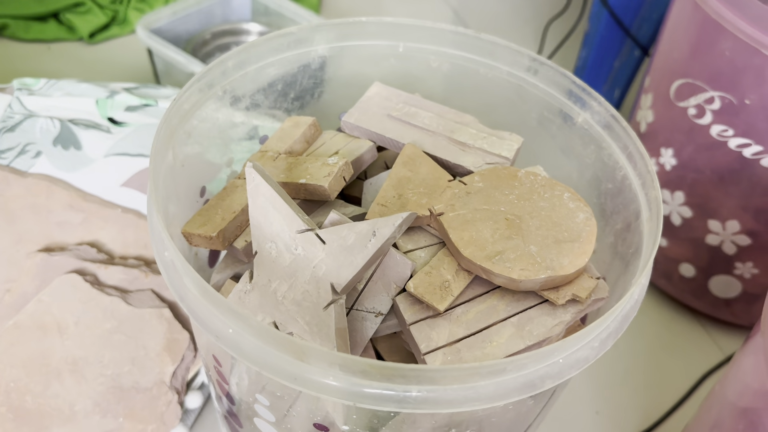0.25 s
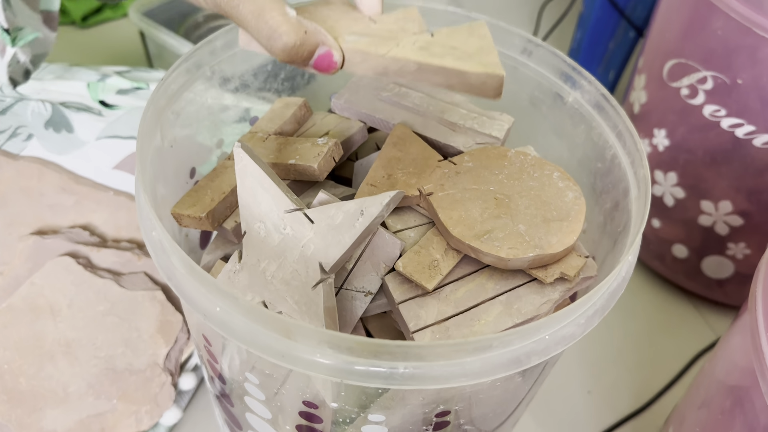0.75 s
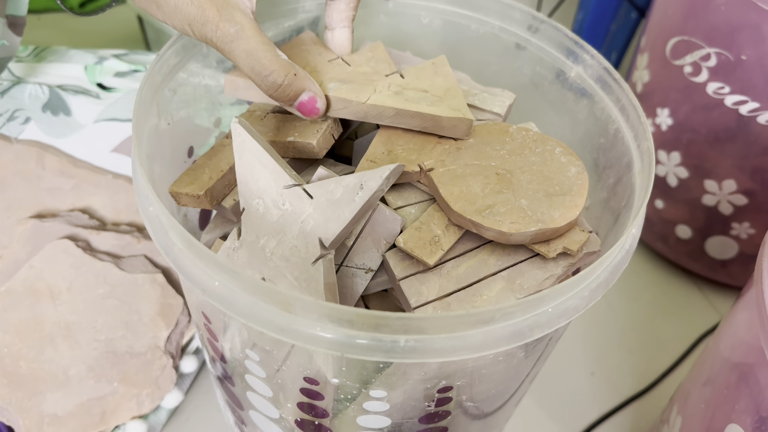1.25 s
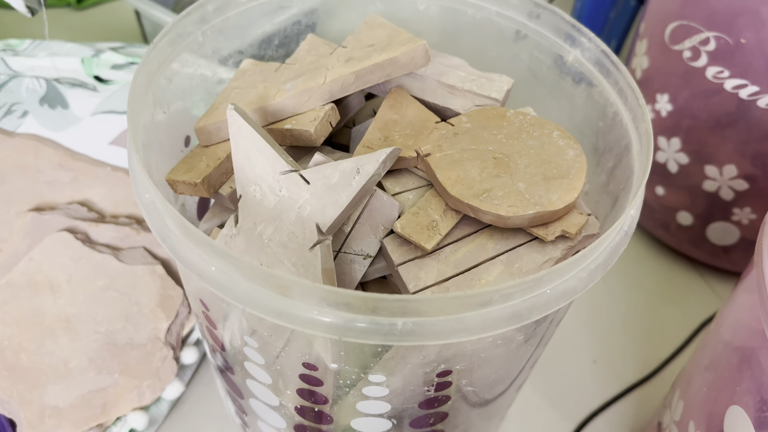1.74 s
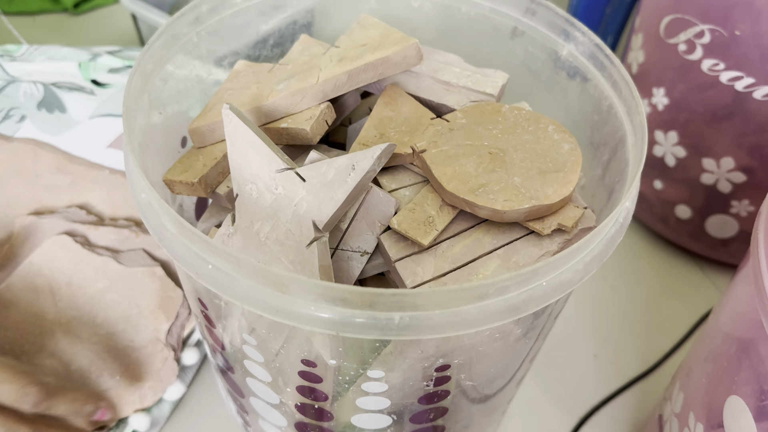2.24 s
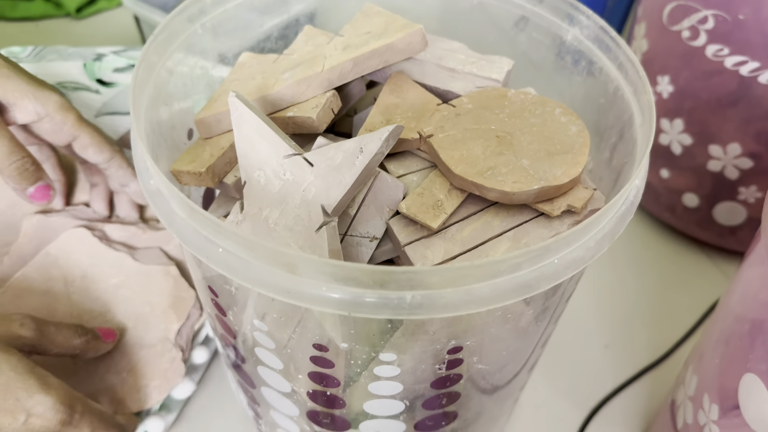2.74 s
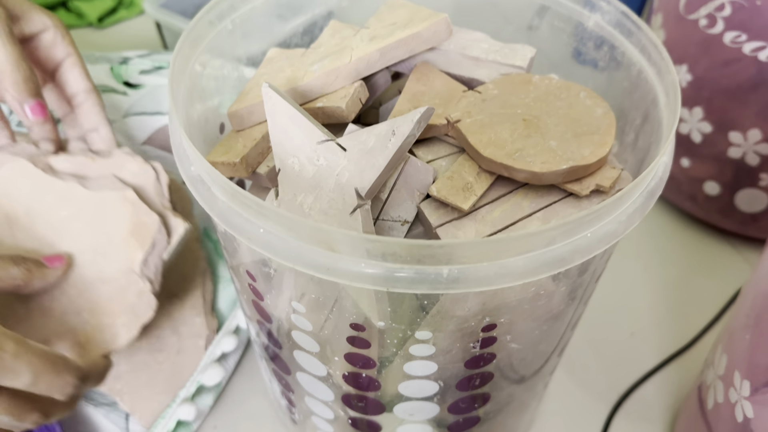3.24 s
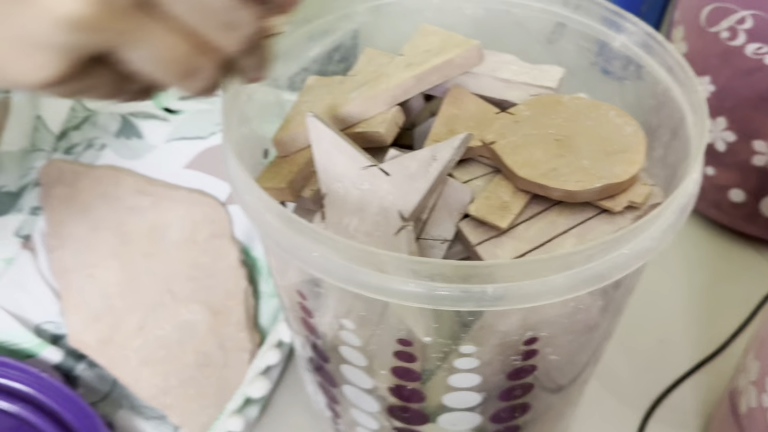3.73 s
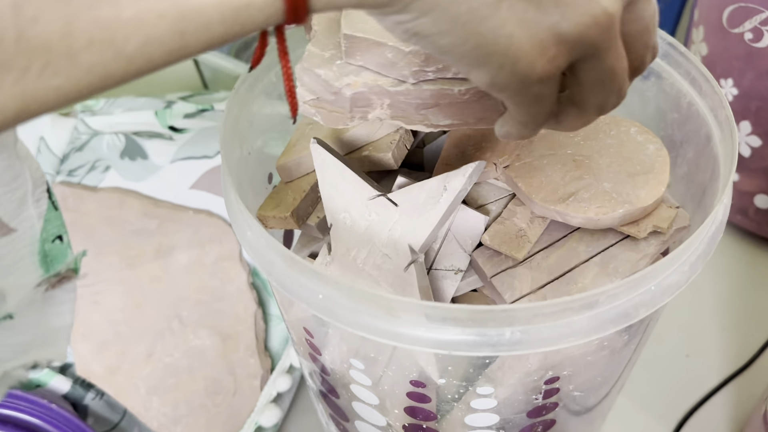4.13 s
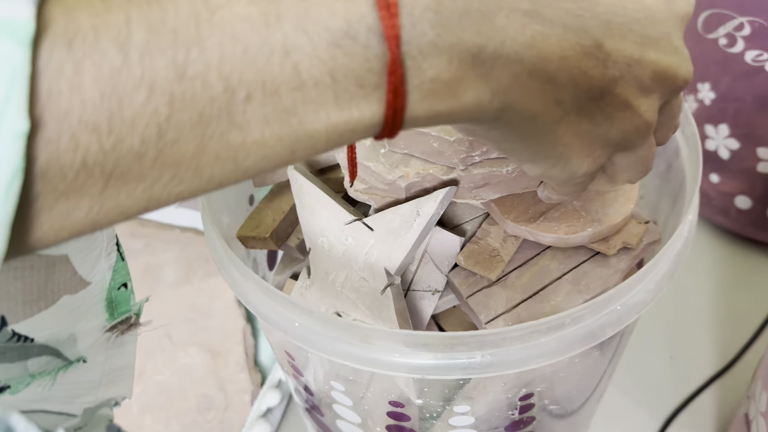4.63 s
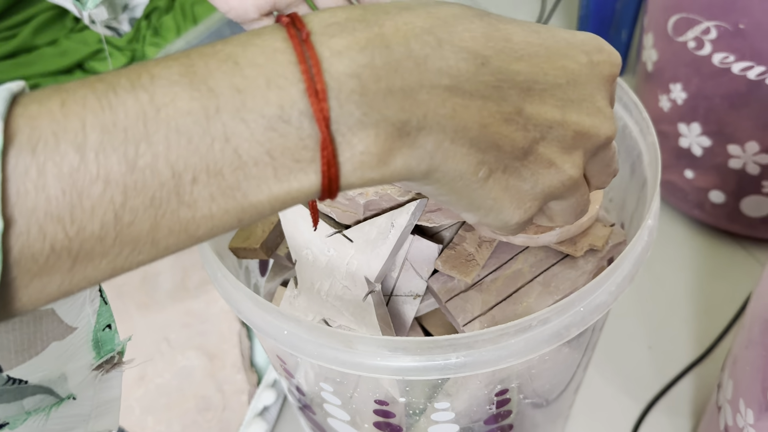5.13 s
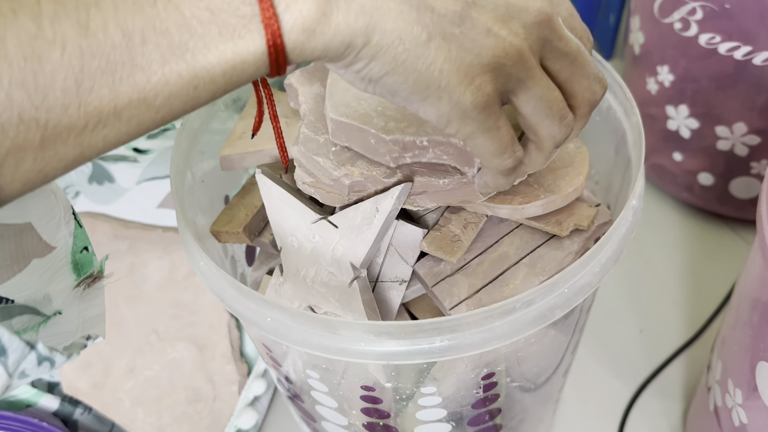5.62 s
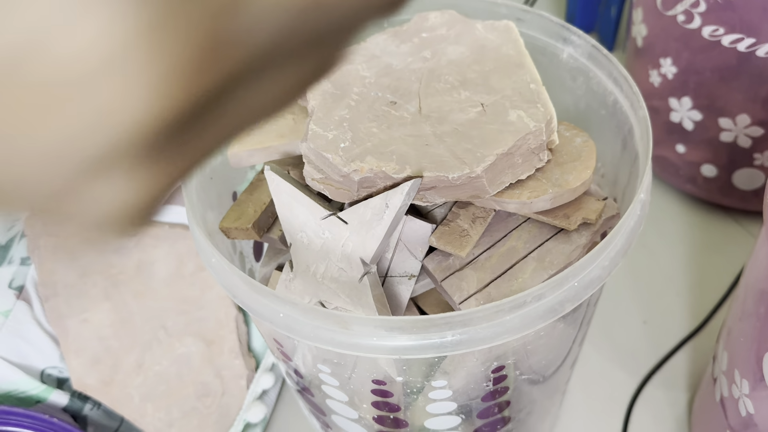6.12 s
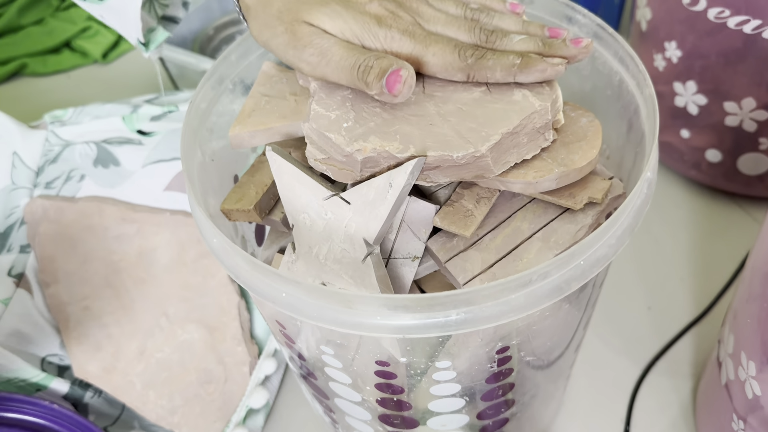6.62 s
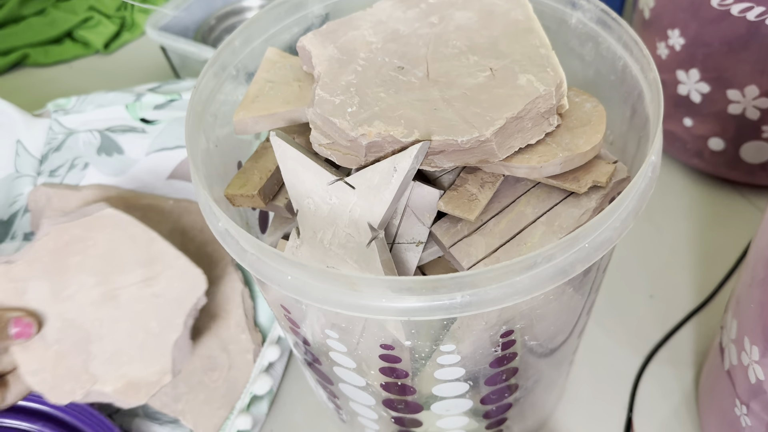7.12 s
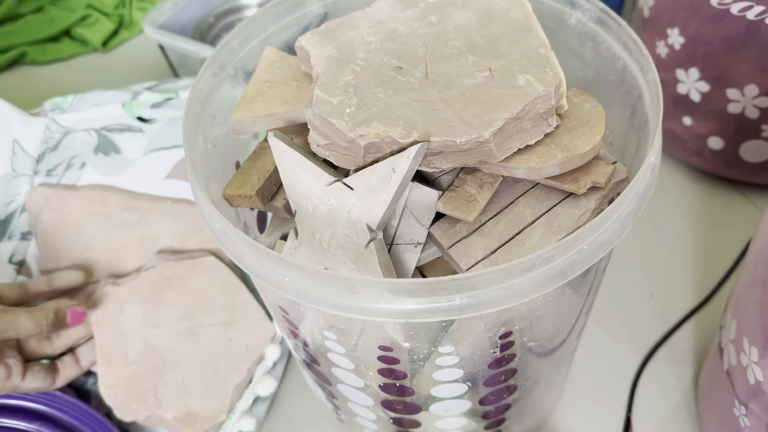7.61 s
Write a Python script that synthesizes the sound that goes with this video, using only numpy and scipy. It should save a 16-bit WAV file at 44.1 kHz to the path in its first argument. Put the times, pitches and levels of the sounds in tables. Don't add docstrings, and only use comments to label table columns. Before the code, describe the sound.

Dry, brittle clay pieces clack, tick and scrape as hands stack them in a plastic tub indoors, over a low distant street rumble.

```python
import sys
import numpy as np
from scipy import signal
from scipy.fft import rfft, irfft
from scipy.io import wavfile
from scipy.ndimage import uniform_filter1d

SR = 44100
rng = np.random.default_rng(int(sys.argv[2]) if len(sys.argv) > 2 else 0)


def voltage_ratio(decibels):
    exponent = np.asarray(decibels, float) / 20
    return 10 ** exponent


def store_pcm(level_fs):
    pcm = np.round(np.clip(level_fs, -1, 1) * 32767).astype(np.int16)
    wavfile.write(sys.argv[1], SR, np.atleast_2d(pcm).T)


N = 346626


def knocks(events, modes, crack_db, crush_s, size, own_share=1):
    lag_s_per_db = 0.00003
    room_hears_ring, room_hears_clack = 0.5, 0.64
    out = np.zeros((3, N + size))
    t = np.arange(size) / SR
    hz, level_db, t60_s = np.transpose(modes)[:, :, None]
    bins_hz = np.arange(size // 2 + 1) * SR / size + 1
    low_cut = 1 / (1 + (0.7 * hz.min() / bins_hz) ** 4)
    high_cut = 1 / (1 + (bins_hz / hz.max() / 1.4) ** 4)
    luck = rng.standard_normal((len(events), 4, len(modes), 1))
    noises = rng.standard_normal((len(events), size))
    swell = 1 - np.exp(-t * hz / 0.71)
    decay = voltage_ratio(-60 * t / t60_s)
    for row, (uneven, detune, facing, phase), noise in zip(events, luck, noises):
        start_s, peak_db, pan_db, treble_db, room_db = row
        pan_db = np.clip(pan_db, -9, 9)
        hardness_db = (treble_db + 12) / 3

        struck = voltage_ratio(level_db + hardness_db * np.log2(hz / 1000) + 1.5 * uneven)
        cycles = hz * (1 + 0.0089 * detune) * t + phase
        rings = struck * swell * np.sin(2 * np.pi * cycles) * decay
        scale = voltage_ratio(peak_db) / np.abs(rings.sum(axis=0)).max()
        ring = scale * rings.sum(axis=0)

        tilt_db = hardness_db * np.log2(np.maximum(bins_hz, hz.min()) / 1000)
        colour = voltage_ratio(at_hz(modes, bins_hz) + tilt_db) * low_cut * high_cut
        crush = irfft(rfft(noise) * colour) * t / (t + 0.18 * crush_s) * np.exp(-t / crush_s)
        crush = crush * voltage_ratio(peak_db + crack_db) / np.abs(crush).max()
        clack = np.roll(irfft(colour), 128) * (t < t[-1] / 2)
        clack = rms_one(clack) * np.sqrt(np.mean(ring ** 2))

        for ear, side in enumerate([1, -1]):
            at = round((start_s - side * pan_db * lag_s_per_db / 2) * SR)
            heard = scale * (rings * voltage_ratio(side * 2 * facing)).sum(axis=0) + crush
            out[ear, at:at + size] += voltage_ratio(side * pan_db / 2) * heard
        at = round(start_s * SR)
        feed = own_share * (room_hears_ring * ring + crush) + room_hears_clack * clack
        out[2, at:at + size] += voltage_ratio(room_db) * feed
    return out[:, :N]


def bars():
    # start_s, peak_db, pan_db, treble_db, room_db
    bar_knocks = [
        (0.065, -20.5, 7, 2, 3.5),
        (0.072, -32.5, 22, -26.5, -11),
        (0.164, -12.5, 6.5, -12.5, 1.5),
        (0.167, -14.5, 9, -8.5, -8.5),
        (0.18, -23, 6, -21, -0.5),
    ]
    # mode_hz, level_db, t60_s
    bar_modes = [(490, -4, 0.03), (657, -14, 0.0073), (800, -3.5, 0.015), (956, 1.5, 0.013),
                 (1352, 2, 0.016), (1730, -2, 0.004), (2180, -3, 0.022), (2590, -7, 0.011),
                 (3095, -7, 0.012), (3320, -11, 0.003), (4390, -16.5, 0.014), (4900, -20.5, 0.014),
                 (6480, -16.5, 0.0074), (8600, -31.5, 0.019)]
    return knocks(bar_knocks, bar_modes, crack_db=-4.5, crush_s=0.0038, size=2048, own_share=0.3)


def slabs():
    # start_s, peak_db, pan_db, treble_db, room_db
    laid_knocks = [
        (7.3272, -31, 8, -15, -9),
        (7.3305, -26, 1.5, -27.5, 0.5),
        (7.343, -29, 3.5, -34.5, 1.5),
        (7.354, -33, 0, -38, 3.5),
    ]
    # mode_hz, level_db, t60_s
    held_modes = [(198, -2.5, 0.17), (270, -14, .03), (362.4, 0.5, 0.084), (457, 3, 0.036),
                  (555, 10.5, 0.033), (785, 11.5, 0.036), (940, -1, 0.046), (1340, 7, 0.084),
                  (1700, 5, 0.042), (1980, -1, 0.034), (2350, -13.5, .01), (3100, -3, 0.037),
                  (4200, -21, .01), (6190, -11, .025)]
    # start_s, peak_db, pan_db, treble_db, room_db
    drop_knocks = [
        (7.7415, -18.5, 2.1, 0, -13),
        (7.7465, -20, 2.9, -22, 0.5),
        (7.771, -23.5, 0.58, -33, 3.5),
        (7.777, -23, 1, -30, -9),
        (7.797, -33, 1, -24.5, -8.5),
        (7.811, -30.5, 1.3, -25, -19),
        (7.838, -36, 1.5, -35, -4),
    ]
    # mode_hz, level_db, t60_s
    slab_modes = [(195.4, -4, 0.1), (276, -12, 0.026), (357.7, 1, 0.085), (392, 1, 0.051), (590, 6, 0.052),
                  (787, 12.5, 0.073), (1060, -6.5, 0.027), (1330, 5, 0.11), (1790, 0, 0.03),
                  (2225, 5, 0.034), (2750, -7, 0.014), (3240, -3.5, 0.022), (5100, -14, 0.01),
                  (6800, -16.5, 0.011)]
    laid = knocks(laid_knocks, held_modes, crack_db=-3.0, crush_s=0.0044, size=4096)
    return laid + knocks(drop_knocks, slab_modes, crack_db=-3.5, crush_s=0.0026, size=4096)


def disc():
    # start_s, peak_db, pan_db, treble_db, room_db
    disc_knocks = [
        (5.364, -29.5, 0, -27, 0.5),
        (5.936, -55, 0.00098, -20, 2),
    ]
    # start_s, peak_db, pan_db, treble_db, room_db
    disc_rocks = [
        (5.3665, -28, -1.5, -10, -21),
    ]
    # mode_hz, level_db, t60_s
    disc_modes = [(265, -1.5, 0.031), (478, -9.5, 0.06), (800, 6.5, 0.027), (1137, -2.5, 0.032),
                  (1986, 6, 0.021), (2420, -6.5, 0.053), (2550, -1, 0.024), (3160, 9.5, 0.0081),
                  (3840, -4, 0.02), (4280, -1, 0.024), (4420, -2.5, 0.03), (6200, -6, 0.004),
                  (8370, -0.5, 0.01)]
    set_down = knocks(disc_knocks, disc_modes, crack_db=-10.0, crush_s=0.002, size=2048)
    return set_down + knocks(disc_rocks, disc_modes, crack_db=-9.0, crush_s=0.0023, size=2048)


def toothed_piece():
    # start_s, peak_db, pan_db, treble_db, room_db
    touch_knocks = [
        (1.129, -37, 1, -24, 0.5),
    ]
    # mode_hz, level_db, t60_s
    touch_modes = [(372, 2, 0.0051), (720, -4, 0.02), (1430, -2, 0.025), (1910, 7, 0.021),
                   (2310, -1.5, 0.017), (2790, 1, 0.013), (3230, 0.5, 0.046), (3970, -9, 0.017),
                   (4640, -6, 0.023), (5660, -16, .01), (8160, -10, 0.0098)]
    # start_s, peak_db, pan_db, treble_db, room_db
    tooth_knocks = [(1.249, -58, 4.5, -12, -13), (1.356, -49.5, 3, -1, -8), (1.398, -52, 2, -4, -12),
                    (1.414, -48, 8, -21, 2), (1.424, -46.5, 1.5, -8, -5), (1.452, -48.5, 5, -23, 11),
                    (1.462, -56, 1, -22.5, 5), (1.488, -50, 2, -14, -12), (1.634, -58, 0.5, 6, -16)]
    # mode_hz, level_db, t60_s
    tooth_modes = [(690, 4, 0.012), (1150, 1, 0.016), (1590, -1, 0.016), (2230, 0.5, 0.03),
                   (3000, -22, .01), (3840, -9.5, .018), (4130, -13, 0.026), (5300, -12, 0.01)]
    # start_s, peak_db, pan_db, treble_db, room_db
    landing_knocks = [
        (1.5827, -32.5, 5, -8.5, -3),
        (1.599, -45, 1, -9, -3),
        (1.612, -43.5, -6, -29, 0),
        (1.640, -45, 4, -26, 2),
    ]
    # mode_hz, level_db, t60_s
    landing_modes = [(310, -6.5, 0.036), (510, -4, 0.016), (810, 0, 0.02), (1370, -5, 0.012),
                     (2080, -17, 0.031), (2560, -11, 0.016), (3520, -17.5, .012), (4600, -32.5, .012),
                     (7500, -33.5, .005)]
    touch = knocks(touch_knocks, touch_modes, crack_db=-2.5, crush_s=0.0048, size=2048)
    teeth = knocks(tooth_knocks, tooth_modes, crack_db=-2.5, crush_s=0.0045, size=2048)
    return touch + teeth + knocks(landing_knocks, landing_modes, crack_db=-1.5, crush_s=0.004, size=2048)


def pile():
    # start_s, peak_db, pan_db, treble_db, room_db
    pile_knocks = [(1.317, -51.5, 0, -43, 4), (2.512, -54.5, 5, -10, 0), (2.53, -48, 9, -36, 3.5),
                   (2.598, -54, 6, -16.5, -7), (2.869, -57.5, 8, 7, -11), (3.459, -46, 5.5, -25.5, -18),
                   (4.355, -49, 1.5, -24.5, 2), (4.437, -53.5, -7, -19, -11), (4.477, -59.5, -0.5, -9, -11),
                   (5.599, -52, 3, -41, 0), (5.618, -55, -7, -42, 3)]
    # mode_hz, level_db, t60_s
    pile_modes = [(294, -5.5, 0.014), (504, -12, 0.0019), (650, -7, 0.036), (910, -9, 0.02),
                  (1400, -12, 0.048), (1850, -14.5, 0.026), (2350, -7.5, 0.038), (3080, -16.5, 0.036),
                  (4650, -23, 0.01), (7460, -31, 0.005)]
    # start_s, peak_db, pan_db, treble_db, room_db
    stack_knocks = [(4.458, -51, 2, -17, 3), (4.483, -50.5, 5, -23, -3), (4.517, -48.5, -5, -9, -12),
                    (4.557, -36, -5, -26.5, -4), (4.721, -47.5, 3, -17, 7.5), (4.734, -56, 2, -31, -6),
                    (4.773, -44.5, 3.5, 5.5, -3.5), (4.782, -40.5, -2, -50, 2.5), (4.808, -54, 3, -31, 2),
                    (4.836, -48.5, 0, -54, -24), (6.505, -41, -3.5, -2, 2), (6.523, -41, -1.5, -9, -5),
                    (6.539, -44, -3, -43, 2.5), (6.639, -51, -4, -15, -3), (6.787, -44.5, -2, 8, -5.5),
                    (6.799, -41.5, 3, -55, -18), (6.85, -51.5, -4, -21, 4.5)]
    # mode_hz, level_db, t60_s
    stack_modes = [(300, -2.5, 0.0068), (527, -6.5, 0.027), (742, -1.5, 0.04), (871, -2.5, 0.04),
                   (1188, -8.5, 0.029), (1740, -11, 0.049), (2255, -16, 0.022), (3270, -24.5, 0.019)]
    nudged = knocks(pile_knocks, pile_modes, crack_db=1.0, crush_s=0.0054, size=2048)
    return nudged + knocks(stack_knocks, stack_modes, crack_db=-9.5, crush_s=0.026, size=4096)


def tub():
    # start_s, peak_db, pan_db, treble_db, room_db
    wall_thumps = [
        (3.7005, -25.5, -4.5, -12, -26),
        (3.713, -31.5, -9, -5, -27),
    ]
    # mode_hz, level_db, t60_s
    wall_modes = [(140, -2, 0.032), (320, -1, 0.015), (470, 0.5, 0.013), (928, -12, 0.0081),
                  (1540, -14, 0.013)]
    # start_s, peak_db, pan_db, treble_db, room_db
    air_booms = [
        (1.599, -50.5, -4, -18, -20),
        (2.534, -45, 1, -2, -33),
        (2.598, -47, 1, -1, -19),
        (5.374, -57, -1, -10, -20),
    ]
    # mode_hz, level_db, t60_s
    air_modes = [(174, -31, .3), (189.2, 0, 0.41), (199.7, -2.5, 0.3)]
    thumps = knocks(wall_thumps, wall_modes, crack_db=-6.0, crush_s=0.0057, size=2048)
    return thumps + knocks(air_booms, air_modes, crack_db=-12.0, crush_s=0.0069, size=16384)


def chips():
    # start_s, peak_db, pan_db, treble_db, room_db
    chip_ticks = [(1.129, -50, -10.5, -23, -30), (1.397, -52, 4.5, -23, -20),
                  (1.634, -54.5, -3.5, -23, -23), (2.513, -53.5, 10.5, -60, -29), (3.591, -53, 3, -30, -24),
                  (3.6985, -35, 2, -31, -20), (3.716, -35.5, 1.5, -14, -28), (4.436, -60, 4.5, -15, -20),
                  (5.366, -62.5, 7, -32, -35), (5.934, -43, 2, 21, -10), (6.14, -41, 3.5, -35, -6),
                  (6.502, -65, 14.5, -18, -10), (6.512, -61, 2, -27, -17), (6.522, -54, 5, -34, -24),
                  (6.53, -57, 3, -6, -15), (6.788, -50, 7, -6, -25), (6.797, -59, -2, -7, -17),
                  (6.805, -60, -1, -4, -15)]
    # start_s, peak_db, pan_db, treble_db, room_db
    wall_scuffs = [
        (3.688, -71, 0, -41, -34),
        (3.708, -69, 3.5, -54, -16),
    ]
    # mode_hz, level_db, t60_s
    chip_modes = [(3570, -0.5, 0.0016), (6120, 6.5, 0.0033), (8160, 6.5, 0.0044), (11800, 5, 0.004),
                  (14800, 1.5, 0.005)]
    ticks = knocks(chip_ticks, chip_modes, crack_db=0.5, crush_s=0.0023, size=1024)
    return ticks + knocks(wall_scuffs, chip_modes, crack_db=21.0, crush_s=0.0064, size=2048)


def crumbs():
    # start_s, peak_db, pan_db, pitch_hz
    crumb_hits = [(1.137, -48, -6, 373), (1.268, -61, 12, 528), (1.298, -60, -4, 470), (1.513, -48, 1, 350),
                  (1.529, -50, 8, 301), (1.544, -46, 4, 396), (1.681, -47, 5, 310), (1.74, -63, 2, 388),
                  (2.79, -58, 6, 382), (2.869, -56.5, 1, 566), (2.913, -56, 11, 360), (3.261, -64, -1, 300),
                  (3.428, -63.5, 7, 310), (3.551, -59, -1, 304), (3.578, -56, 2, 369),
                  (3.662, -50, 0.5, 475), (7.298, -65, 0, 480), (7.454, -53, 0, 568), (7.534, -54, 4, 630),
                  (7.577, -53, 1.0, 404), (7.634, -52, 2, 410), (7.682, -67, -3, 420), (7.713, -64, 6, 366)]
    # start_s, peak_db, pan_db, pitch_hz
    more_crumb_hits = [(1.315, -55, 5, 890), (1.46, -56, 2, 1040), (1.478, -59, 5, 1500),
                       (2.531, -51.5, 11, 685), (3.041, -56, 7, 626), (3.056, -55.5, 9, 620),
                       (3.431, -54, -5, 1400), (3.687, -46, -1, 800), (5.62, -62.5, 0, 1700)]
    # start_s, peak_db, pan_db, pitch_hz
    nail_ticks = [
        (2.513, -53, 2, 2460),
        (2.533, -60, 4, 2560),
        (2.549, -59, 5, 2520),
        (2.591, -57, 6, 2490),
        (3.459, -51, -6, 710),
    ]
    ring_cycles, room_db = 11.8, -0.5
    total = np.zeros((3, N))
    for start_s, peak_db, pan_db, pitch_hz in [*crumb_hits, *more_crumb_hits, *nail_ticks]:
        t60_s = ring_cycles / pitch_hz
        modes = [(pitch_hz, 0, t60_s), (2.4 * pitch_hz, -11, t60_s / 2)]
        event = (start_s, peak_db, pan_db, -12, room_db)
        total += knocks([event], modes, crack_db=-4.0, crush_s=0.0052, size=2048)
    return total


def rubbing():
    # hz, density_db
    body_spectrum = [(120, 6), (250, -1), (500, -4), (800, -10), (1400, -10.5), (2500, -19.5), (3500, -40)]
    # hz, density_db
    dust_spectrum = [(1500, -16), (2500, -0.5), (3200, 1), (4500, -4.5), (5500, -5), (6900, -1.5),
                     (8500, -6.5), (10000, -17.5)]
    # hz, density_db
    fine_spectrum = [(10500, -2.5), (12200, -2), (14300, 3.5), (15600, 4.5), (16200, -32.5)]
    still_db = [[-64.5], [-82], [-99]]
    body, dust, fine = strokes() + voltage_ratio(still_db)
    rub = body * grit(body_spectrum, grain_db=4.0)
    rub = rub + dust * grit(dust_spectrum, grain_db=2.5)
    return rub + fine * grit(fine_spectrum, grain_db=2.5)


def strokes():
    # middle_s, half_length_s, body_db, dust_db, fingertip_hiss_db
    hand_strokes = [(0.25, 0.85, -72.5, -79, -105), (1.3, 0.1, -79, -86.5, -75),
                    (1.434, 0.12, -61, -70, -85), (1.505, 0.12, -66, -70, -58.5),
                    (2.036, 0.093, -70, -88, -73), (2.402, 0.41, -73, -75, -105),
                    (2.914, 0.35, -67, -69.5, -83.5), (3.383, 0.27, -71, -77.5, -105),
                    (3.702, 0.32, -61.5, -78.5, -84.5), (4.522, 0.11, -77, -66, -88),
                    (4.89, 0.28, -99, -75.5, -105), (5.348, 0.034, -80.5, -80.5, -65),
                    (5.63, 0.055, -76, -75, -105), (5.844, 0.14, -108, -91, -66.5),
                    (6.52, 0.041, -77.5, -71, -69), (6.346, 0.44, -71, -78.5, -98),
                    (6.814, 0.065, -55.5, -99, -97), (7.026, 0.82, -84, -81.5, -84),
                    (7.652, 0.47, -68, -71, -83.5), (7.86, 0.28, -50, -72, -102)]
    fade_db, point = 31.5, 1.6
    middle_s, half_s, *levels_db = np.transpose(hand_strokes)
    t = np.arange(0, N + 64, 64) / SR
    distance = np.abs(t - middle_s[:, None]) / half_s[:, None]
    gains = voltage_ratio(np.array(levels_db)) @ voltage_ratio(-fade_db * distance ** point)
    return np.array([np.interp(np.arange(N) / SR, t, gain) for gain in gains])


def grit(spectrum, grain_db):
    grain_size = np.minimum(rng.exponential(1, N), 5)
    grains = rng.standard_normal((2, N)) * voltage_ratio(grain_db * grain_size)
    return diffuse(grains, spectrum) * voltage_ratio(1.5 * drift(30))


def rasps():
    # start_s, end_s, resonance_hz, width_hz, level_db
    slide_rasps = [(1.375, 1.565, 2290, 220, -72), (1.495, 1.581, 7510, 310, -64.5),
                   (2.301, 2.501, 6010, 260, -78), (2.41, 2.79, 3170, 210, -86),
                   (2.99, 3.17, 3140, 240, -84), (3.045, 3.19, 1360, 130, -76),
                   (3.21, 3.55, 1410, 210, -78), (3.26, 3.41, 3090, 210, -85), (4.09, 4.31, 910, 160, -78),
                   (4.21, 4.34, 1510, 310, -81), (4.47, 4.54, 6310, 400, -69),
                   (5.78, 5.917, 6970, 500, -72), (5.785, 5.925, 4710, 290, -79),
                   (7.41, 7.79, 1890, 160, -73), (7.46, 7.79, 4740, 260, -76), (7.49, 7.78, 6010, 210, -74),
                   (7.61, 7.76, 3160, 160, -76)]
    # start_s, end_s, resonance_hz, width_hz, level_db
    blow_chatters = [(1.132, 1.28, 1920, 110, -66), (1.133, 1.24, 4680, 160, -76),
                     (1.134, 1.24, 3320, 150, -75), (5.372, 5.56, 4410, 120, -69),
                     (5.372, 5.5, 2003, 120, -67), (7.335, 7.48, 3200, 200, -69),
                     (7.752, 7.9, 1357, 80, -58), (7.752, 7.9, 2230, 110, -59),
                     (7.332, 7.58, 1335, 90, -60), (7.338, 7.42, 4800, 260, -65),
                     (7.752, 7.9, 3275, 200, -54), (7.753, 7.9, 4530, 130, -64)]
    out = np.zeros((2, N + SR))
    white = rng.standard_normal((2, N + SR))
    flicker = np.pad(voltage_ratio(2.5 * drift(35)), (0, SR))
    for rows, first_turn in ((slide_rasps, 0), (blow_chatters, 0.5)):
        for start_s, end_s, hz, width_hz, level_db in rows:
            span = slice(round(start_s * SR), round(end_s * SR))
            tone = resonate(white[:, span], hz, width_hz)
            shape = np.sin(np.pi * np.linspace(first_turn, 1, tone.shape[1]))
            out[:, span] += voltage_ratio(level_db) * rms_one(tone) * flicker[span] * shape
    return out[:, :N]


def room():
    # hz, t60_s
    room_t60 = [(150, 0.44), (500, 0.47), (1500, 0.39), (4000, 0.35), (8000, 0.27), (15000, 0.26)]
    t = np.arange(32768) / SR
    echoes = diffuse(rng.standard_normal((2, 32768)), [(100, 0.0073), (16000, 0.029)])

    cells = signal.stft(echoes, nperseg=1024)[2]
    power = uniform_filter1d(np.abs(cells) ** 2, size=5, axis=1)
    power = uniform_filter1d(power, size=3, axis=2)
    echoes = signal.istft(cells / np.sqrt(power + 1e-12), nperseg=1024)[1][:, :len(t)]

    tail = 0
    edges_hz = 90 * 2 ** np.arange(0, 8.0, 1.0)
    for low, high in zip(edges_hz, np.append(edges_hz[1:], 20000)):
        sos = signal.butter(2, [low, high], "band", fs=SR, output="sos")
        decay = voltage_ratio(-60 * t / at_hz(room_t60, np.sqrt(low * high)))
        tail = tail + signal.sosfilt(sos, echoes) * decay
    tail = tail * (1 - np.exp(-(t / 0.003) ** 2))

    spectrum = rfft(np.array([[1, 0.98], [1, -1]]) @ tail)
    fine = uniform_filter1d(np.abs(spectrum) ** 2, 90)
    broad = uniform_filter1d(np.abs(spectrum) ** 2, 900)
    tail = irfft(spectrum * np.sqrt(broad / fine))[:, :len(t) * 3 // 4]
    tail = np.array([[1, 1], [1, -1]]) @ tail
    return tail / np.sqrt(np.sum(tail ** 2) / 2)


def engines():
    # time_s, firing_hz, level_db
    near_engine = [(2.8, 57, -84), (3.41, 58.44, -56.5), (3.75, 59.2, -47), (4.03, 58.8, -39.5),
                   (4.22, 55.5, -43), (4.42, 64.2, -58), (4.7, 61, -92)]
    # time_s, firing_hz, level_db
    far_engine = [(5.0, 77.9, -88), (5.35, 78.76, -70), (5.85, 80.7, -62), (6.3, 85, -62), (6.651, 87, -55),
                  (7.0, 83.8, -89)]
    total = 0
    for rows in (near_engine, far_engine):
        hz, level_db = in_time(rows)
        total = total + np.sqrt(2) * voltage_ratio(level_db) * np.sin(2 * np.pi * np.cumsum(hz) / SR)
    return total * voltage_ratio([[-0.3], [0.3]])


def street():
    # time_s, level_db
    street_swell = [(0, -1), (.5, -5), (1, -2.5), (1.4, 3), (1.7, 3), (2.1, 1), (2.45, 0.5), (2.9, 3),
                    (3.3, 3), (4.5, 1), (5, 2), (5.5, 0), (5.8, -2), (6.1, -0.5), (6.6, 2), (7.1, 0.5),
                    (7.5, -3.5), (7.86, 5.5)]
    # hz, density_db
    rumble_spectrum = [(30, -32.5), (42, -3.5), (60, 10), (90, 0), (125, -1), (190, -1), (260, -18.5),
                       (400, -47)]
    # mode_hz, width_hz, level_db
    room_drones = [
        (62.9, 4.1, -57),
        (87, 13, -59.5),
    ]
    (street_db,) = in_time(street_swell)
    rumble_db = -61 + street_db + 0.79 * drift(4.6)
    rumble = diffuse(rng.standard_normal((2, N)), rumble_spectrum) * voltage_ratio(rumble_db)
    drones = 0
    for hz, width_hz, level_db in room_drones:
        drone = resonate(rng.standard_normal(N + SR), hz, width_hz)[SR:]
        drones = drones + voltage_ratio(level_db + street_db) * rms_one(drone)
    return drones * voltage_ratio([[-0.3], [0.3]]) + rumble


def diffuse(white, spectrum):
    # hz, left_right_likeness
    likeness = [(60, 0.84), (180, 0.93), (550, 0.21), (1650, -0.12), (4970, 0.2), (15000, -0.34)]
    size = white.shape[1]
    hz = np.arange(size // 2 + 1) * SR / size
    alike = np.clip(at_hz(likeness, hz), -1, 1)
    mid, side = rfft(white) * voltage_ratio(at_hz(spectrum, hz))
    mid = mid * np.sqrt(1 + alike)
    side = side * np.sqrt(1 - alike)
    return rms_one(irfft(np.array([mid + side, mid - side]), size))


def resonate(x, hz, width_hz):
    b, a = signal.iirpeak(hz, hz / width_hz, fs=SR)
    return signal.lfilter(b, a, signal.lfilter(b, a, x))


def drift(rate_hz):
    knots = rng.standard_normal(400)
    return np.interp(np.arange(N) / SR * rate_hz, np.arange(400), knots)


def at_hz(points, hz):
    points = np.array(points)
    return np.interp(np.log(hz + 1), np.log(points[:, 0]), points[:, 1])


def in_time(rows):
    time_s, *columns = np.transpose(rows)
    return [np.interp(np.arange(N) / SR, time_s, column) for column in columns]


def rms_one(x):
    return x / np.sqrt(np.mean(x ** 2) + 1e-20)


def scene():
    clay = bars() + slabs() + disc() + toothed_piece() + pile() + tub() + chips() + crumbs()
    clay = signal.sosfilt(signal.butter(3, 139.6, "high", fs=SR, output="sos"), clay)
    reverb = signal.fftconvolve(clay[2:], room())[:, :N]
    return clay[:2] + reverb + rubbing() + rasps() + engines() + street()


def roll_off(x):
    return signal.sosfilt(signal.butter(12, 16500, fs=SR, output="sos"), x)


def record(dry):
    # hz, left_right_db
    port_lean = [(900, 0), (2200, 1), (4000, 2.5), (6200, 6), (8700, 1), (11000, -0.5)]
    mono_above_hz = 13600
    hz = np.arange(N // 2 + 1) * SR / N
    left, right = rfft(dry) * voltage_ratio(at_hz(port_lean, hz) * [[0.5], [-0.5]])
    wide = 1 / (1 + (hz / mono_above_hz) ** 24)
    mid = (left + right) / 2 * np.sqrt(2 - wide)
    side = (left - right) / 2 * wide
    mix = irfft(mid + side * [[1], [-1]], N)
    for sos in (signal.butter(3, [10150, 12600], "bandstop", fs=SR, output="sos"),
                signal.butter(3, 40, "high", fs=SR, output="sos"),
                signal.cheby2(10, 40, 16100, fs=SR, output="sos")):
        mix = signal.sosfilt(sos, mix)
    return roll_off(mix)


dry = scene()
out = record(dry)
store_pcm(out)
```